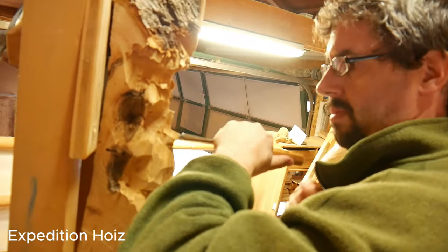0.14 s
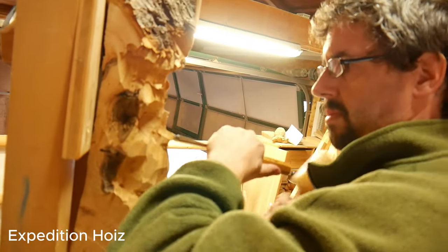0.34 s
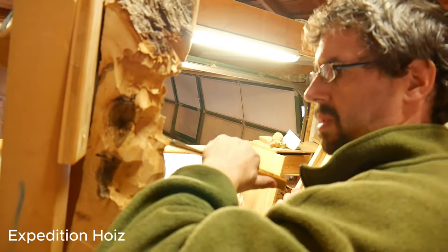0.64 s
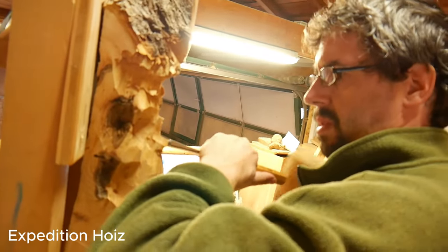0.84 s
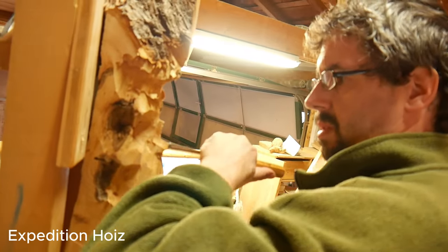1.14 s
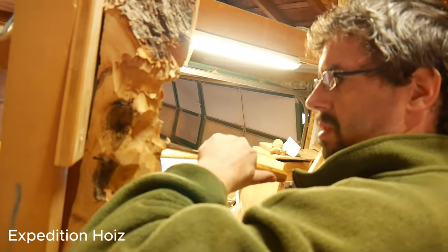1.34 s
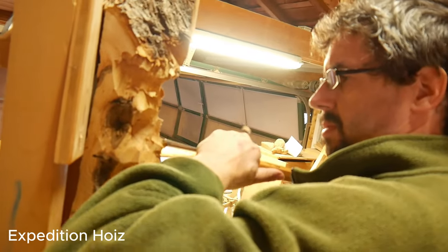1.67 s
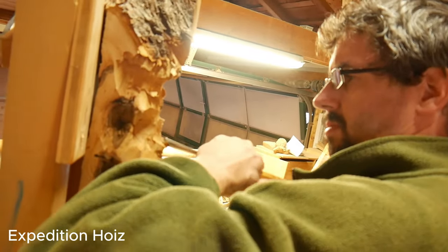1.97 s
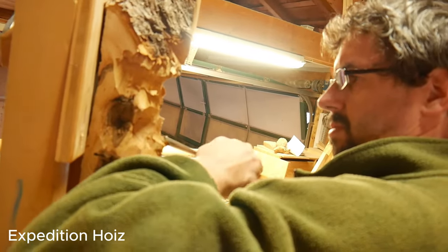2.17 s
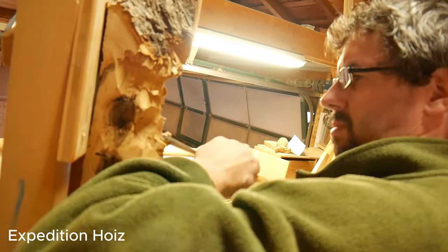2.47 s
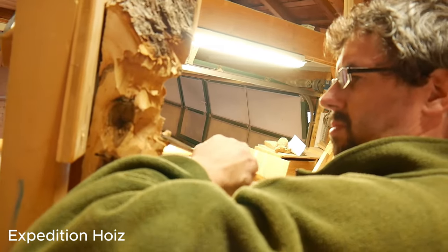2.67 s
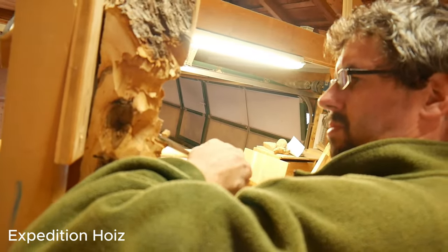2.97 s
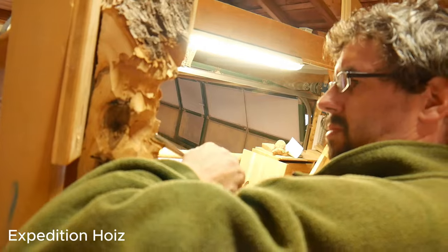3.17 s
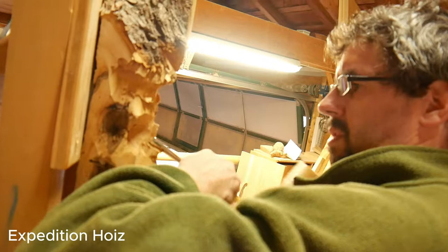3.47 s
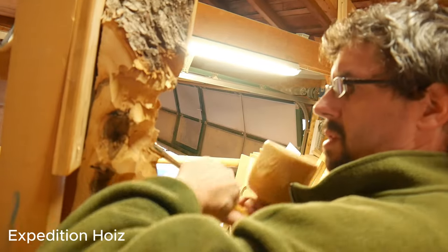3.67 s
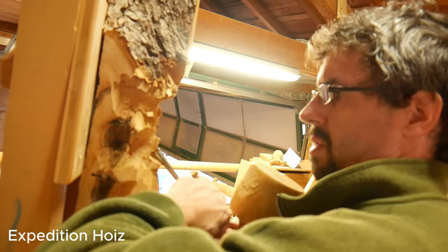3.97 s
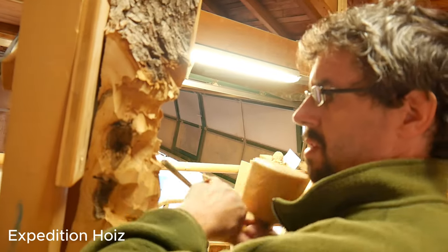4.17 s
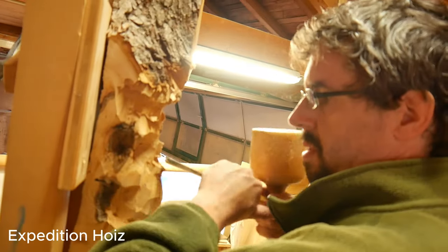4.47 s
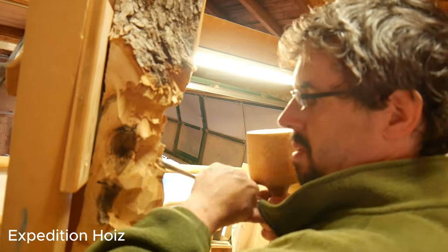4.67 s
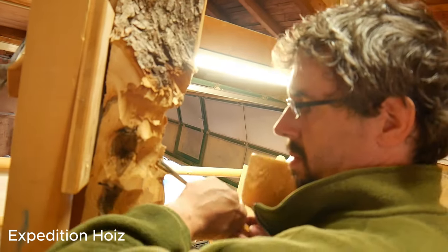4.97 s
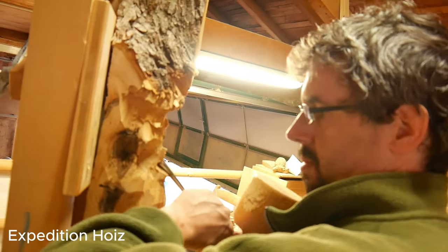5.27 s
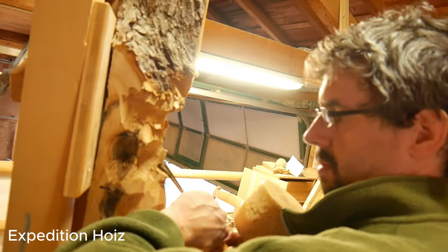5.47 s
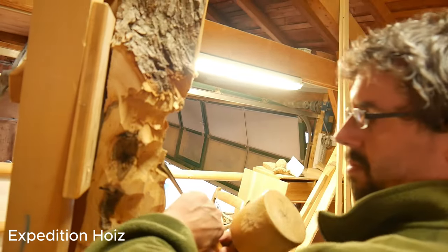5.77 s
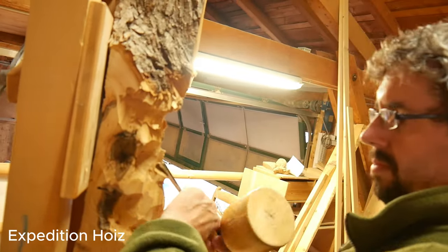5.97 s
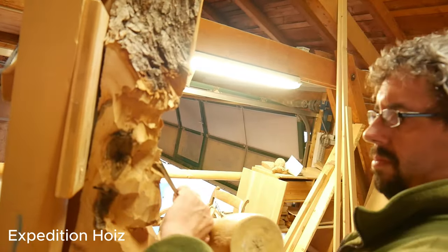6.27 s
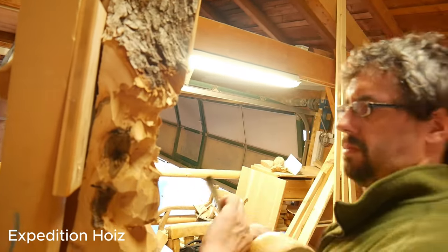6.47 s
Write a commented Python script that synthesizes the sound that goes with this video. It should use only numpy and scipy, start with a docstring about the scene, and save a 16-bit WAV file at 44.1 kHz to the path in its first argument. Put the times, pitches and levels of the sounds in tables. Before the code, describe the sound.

Close, nearly mono sound of carving: a tiny creak, then nine forceful mallet knocks on a gouge set in a log, sharp and woody, slightly distorted at the peaks, with reverberation for around a second. The soft room hum dips under them and returns. Afterwards come light taps, snapping fibres, dull handling bumps and a fleece sleeve rustling, growing clearer toward the end.

```python
"""Carving in a workshop: air, a low wavering hum and faint sleeve fizz; a gouge scuffs and creaks into its cut.
A wooden mallet then drives it into an upright log, nine hard blows and three soft taps: damped and long modes
ring, cracks are noise bursts, the stand rumbles and the room answers with decaying noise.
Filtered grainy noise makes the blade and sleeve rubs, fibre snaps and chip ticks; resonant bursts make the
dull bumps. The close microphone overloads on the hard blows and its gain control ducks the hum."""
import sys
import numpy as np
from scipy import signal
from scipy.fft import rfft, irfft
from scipy.io import wavfile
from scipy.ndimage import uniform_filter1d

SR = 44100
rng = np.random.default_rng(int(sys.argv[2]) if len(sys.argv) > 2 else 0)


def digitize_waveform(pressure):
    """Quantize a signal to 16-bit integers and store it at the path in sys.argv[1].

    Rows of a 2-D input are taken as channels; values are limited to [-1, 1].
    """
    field = np.atleast_2d(pressure).T
    bounded = np.clip(field, -1, 1)
    quanta = np.round(bounded * 32767).astype(np.int16)
    wavfile.write(sys.argv[1], SR, quanta)


N = 291942
TIME = np.arange(N) / SR  # s


def amp(db):
    """Amplitude ratio of a level in dB."""
    return 10 ** (np.asarray(db) / 20)


def unit(x):
    """Scale to rms 1."""
    return x / np.sqrt(np.mean(x ** 2) + 1e-20)


def read(points, hz):
    """A spectrum joined by straight lines on a log-frequency axis."""
    f, value = np.transpose(points)
    return np.interp(np.log(hz + 1), np.log(f + 1), value)


def add(mix, start_s, sound):
    """Mix a sound in at its start time, cut at the end of the mix."""
    part = mix[max(round(start_s * SR), 0):][:len(sound)]
    part += sound[:len(part)]


def noise(points, size):
    """Noise of rms 1 shaped by (hz, db) points."""
    gain = amp(read(points, np.fft.rfftfreq(size, 1 / SR)))
    return unit(irfft(rfft(rng.standard_normal(size)) * gain, size))


def colour(x, points, size=2048):
    """Causal minimum-phase filter with the gain of (hz, db) points."""
    log_gain = np.log(amp(read(points, abs(np.fft.fftfreq(size, 1 / SR)))))
    taps = np.fft.ifft(np.exp(np.conj(signal.hilbert(log_gain)))).real
    return signal.fftconvolve(x, taps[:size // 2])[:len(x)]


def bell(hz, centre_hz, octaves):
    """1 at the centre, falling away on both sides."""
    return np.exp(-.5 * (np.log2(hz / centre_hz) / octaves) ** 2)


# Edges of the friction bands: edge [Hz]
BAND_EDGES_HZ = [300, 1000, 3000, 7000, 16000]


def hump(db, centre_hz, octaves, skirt_db=-38):
    """Levels of the friction bands: strongest around the centre."""
    edges = np.array(BAND_EDGES_HZ)
    band_hz = np.sqrt(edges[1:] * edges[:-1])
    return db + 20 * np.log10(bell(band_hz, centre_hz, octaves) + amp(skirt_db))


def friction(levels_db, size, grain_db):
    """Grainy noise of slipping fibres, with the given level in each band."""
    edges = np.array(BAND_EDGES_HZ)
    band_hz = np.sqrt(edges[1:] * edges[:-1])
    density = np.c_[band_hz, levels_db - 10 * np.log10(np.diff(edges))]
    flicker = unit(uniform_filter1d(rng.standard_normal(size), 40))
    grains = rng.standard_normal(size) * amp(grain_db * flicker)
    shaped = colour(grains, [(80, density[0, 1] - 12), (250, density[0, 1]), *density])
    return unit(shaped) * np.linalg.norm(amp(levels_db))


# Steady workshop air, relative spectrum: pitch_hz [Hz], density_db [dB per Hz]
AIR = [(25, -1), (45, -14.5), (80, 1), (130, -5.5), (190, -4.5), (300, -11.5), (500, -14), (800, -18),
       (1200, -21.5), (1600, -17), (3300, -31.5), (4400, -29), (7000, -40.5), (16000, -40.5)]
AIR_DB = -48
# Machine hum partials: pitch_hz [Hz], level_db [dB rms]
HUM = [(51, -47.5), (77, -52), (101, -61.5), (156, -56.5), (183, -54.5), (194, -58), (386, -63),
       (436, -70.5), (484, -63), (1085, -68)]
# Stir of the sleeve: time_s [s], level_db [dB]
SLEEVE = [(0, -79.5), (3.3, -69.5), (3.8, -58), (4.5, -66), (5.1, -54.5), (5.7, -54.5), (6.0, -54.5),
          (6.62, -42.5)]


def background(waver=0.22):
    """Workshop air, a phase-wavering machine hum and the faint fizz of a fleece sleeve."""
    slow = [(1, 0), (4, -3), (12, -30), (40, -100)]
    hum = np.zeros(N)
    for hz, db in HUM:
        phase_rad = 2 * np.pi * hz * TIME + waver * hz / 50 * noise(slow, N)
        hum += amp(db) * unit(np.sin(phase_rad))
    fizz = noise([(100, 7.5), (800, -0.5), (1500, -8), (2500, -11), (4500, -24.0), (7000, -26), (16000, -27.0)], N)
    flutter_db = 2 * noise([(1, 13.5), (30, 2), (200, -30.5), (1000, -100)], N)
    stir_db = np.interp(TIME, *np.transpose(SLEEVE)) + flutter_db
    return amp(AIR_DB) * noise(AIR, N) + hum + amp(stir_db) * fizz


# Gouge seating: time_s [s], pitch_hz [Hz], creak_db [dB], scuff_db [dB]
CREAK = [(0.02, 152, -65, -50), (0.036, 160, -54.5, -33.5), (0.045, 210, -37, -39),
         (0.059, 287, -38.5, -44), (0.073, 452, -44.5, -57), (.13, 486, -90, -63.5)]


def creak():
    """The gouge scuffs into its cut: shaped noise with a brief rising sine."""
    s, *columns = np.transpose(CREAK)
    t = np.arange(s[0], s[-1], 1 / SR)
    pitch_hz, tone_db, scuff_db = (np.interp(t, s, c) for c in columns)
    tone = unit(np.sin(2 * np.pi * np.cumsum(pitch_hz) / SR))
    scuff = noise([(80, 3.5), (200, -3), (700, 6.0), (1200, -9.5), (3000, -26), (10000, -53)], len(t))
    out = np.zeros(N)
    add(out, s[0], amp(tone_db) * tone + amp(scuff_db) * scuff)
    return out


# Colour shared by every blow: pitch_hz [Hz], gain_db [dB]
STRIKE = [(170, -2.5), (300, 3), (480, -0.5), (830, 0.5), (1080, 2.5), (1600, 1.5), (2600, 3.5), (4500, 0),
          (11000, 2.5)]
SEAT_HZ, SEAT_OCTAVES = 614, 0.11  # the log's main knock, stronger when the edge is firmly seated
SEAT_PUSH_HZ, SEAT_PUSH_OCTAVES = 139, 0.6  # a firm seat also pushes the whole log
FAVOUR_OCTAVES = 0.22  # reach of the landing point's favoured pitch


def strike_tint(seat_db, favoured_hz, lift_db, chip_hz, chip_db, chip_octaves=0.12):
    """Gain (hz, db) of one blow: how the edge sits, where the mallet lands, which chip splits."""
    hz = np.geomspace(100, 16000, 160)
    seated = bell(hz, SEAT_HZ, SEAT_OCTAVES) + bell(hz, SEAT_PUSH_HZ, SEAT_PUSH_OCTAVES)
    db = read(STRIKE, hz) + seat_db * seated + lift_db * bell(hz, favoured_hz, FAVOUR_OCTAVES)
    return np.c_[hz, db + chip_db * bell(hz, chip_hz, chip_octaves)]


# Modes of log, mallet and gouge struck together: pitch_hz [Hz], level_db [dB], t60_s [s]
WOOD = [(130, -19.5, 0.02), (193, -13, 0.034), (262, -14, 0.041), (492, -8, 0.018), (664, -4.5, 0.023),
        (721, -15.5, 0.025), (809, 2.5, 0.011), (822, -12, 0.065), (963, -12, 0.048), (1077, -1, 0.023),
        (1297, -12.5, 0.03), (1510, -7.5, 0.023), (1725, -4, 0.011), (2065, -14.5, 0.018),
        (2644, -7, 0.0063), (3126, -20.5, 0.017), (4170, -25, 0.031), (4740, -28, 0.002),
        (253.8, -41.5, 0.86), (336, -43, 0.97), (610, -30, 0.46), (934, -35, 0.75), (1015, -37.5, 0.64),
        (1103, -42, 0.55), (1220, -42.5, 0.73), (4345, -47, 0.24), (4860, -57, .35)]


def knock(force_db, bite_db, crack_db=-14, crack_s=0.0012, scatter=0.033, click_db=-2, contact_s=0.00051):
    """One blow rings the wood's modes while the edge cracks fibres: as heard close by, and by the room."""
    t = np.arange(SR * 3 // 4) / SR
    hz, db, t60_s = np.transpose(WOOD)[:, :, None]
    damped = t60_s[:, 0] < .15
    # damped modes scatter from blow to blow; the log's long ones stay put
    hz = hz * (1 + scatter * rng.standard_normal(hz.shape) * damped[:, None])
    # a light tap barely seats the edge, so it wakes less of the long ring
    db = db + 1.15 * min(force_db, 0) * ~damped[:, None]
    onset = 1 - np.exp(-t / contact_s)
    modes = -amp(db - 60 * t / t60_s) * np.sin(2 * np.pi * hz * t) * onset
    crack = noise([(300, 5.5), (2000, -1.5), (5000, -0.5), (8000, -9), (11000, -14.0), (16000, -22.0)], len(t))
    close = modes.sum(0) + amp(crack_db + bite_db) * crack * np.exp(-t / crack_s)
    # the room gathers all directions: damped modes and click add in power
    f = np.fft.rfftfreq(2048, 1 / SR)
    click = amp(click_db + read([(500, 0), (2000, 24.5), (5000, 15), (7000, 4.0), (16000, -5.0)], f))
    power = (abs(rfft(modes[damped], 2048)) ** 2).sum(0) + click ** 2
    spread = colour(signal.unit_impulse(len(t)), np.c_[f, 10 * np.log10(power)])
    return close, spread


# Mallet blows, levels relative: start_s [s], force_db [dB], room_send_db [dB], rumble_db [dB],
# seat_db [dB], favoured_hz [Hz], lift_db [dB], crack_db [dB], chip_hz [Hz]
BLOWS = [(0.4145, -2, 0, 6.5, -0.5, 521, 10, -9.5, 3170), (0.8022, 3.5, 2.5, 4, -1.5, 820, 3, 4.5, 3360),
         (1.201, 3.5, 3, 2.5, -2.5, 306, 3.5, 9.5, 3890), (1.5431, 4.5, 3, 2, 1.5, 1550, -0.5, 7, 4400),
         (1.89, 3.5, 2, 1, 3, 300, 0.5, 9, 10100), (2.23, 2, 1.5, -1, -2.5, 1080, 2, 9, 12900),
         (2.5423, 5, 1.5, 0, 3.5, 994, -4, -4.5, 2570), (2.8357, 2, 5, 5, 6.5, 1140, 3, 11, 2370),
         (3.131, 2.5, 2.5, -0.5, 5.5, 970, 2.5, 8, 4670), (3.6512, -12, -2, -7, -9.5, 1056, 9, -3, 2560),
         (4.222, -32, 8, 0, 3.5, 790, 5, -7, 1630), (4.6026, -16.5, 3, -7, -6.5, 850, 4.5, 0.5, 1570)]
CHIP_CLOSE_DB, CHIP_ROOM_DB = 9, 1.5  # the splitting chip's pitch: clear close by, faint in the room


def mallet(level_db=5):
    """All blows: what goes straight to the microphone and what goes into the room."""
    direct, sent = np.zeros(N), np.zeros(N)
    for start_s, force_db, send_db, _, seat_db, favoured_hz, lift_db, bite_db, chip_hz in BLOWS:
        close, spread = knock(force_db, bite_db)
        close = colour(close, strike_tint(seat_db, favoured_hz, lift_db, chip_hz, CHIP_CLOSE_DB))
        spread = colour(spread, strike_tint(seat_db, favoured_hz, lift_db, chip_hz, CHIP_ROOM_DB))
        add(direct, start_s, amp(level_db + force_db) * close)
        add(sent, start_s, amp(level_db + force_db + send_db) * spread)
    return direct, sent


def stand(level_db=-18, swell_s=0.19, t60_s=1.0):
    """Each blow sets the log's stand and the floor rumbling: swelling, decaying low noise."""
    out, t = np.zeros(N), np.arange(SR) / SR
    spectrum = [(25, -19.5), (48, -11.5), (66, -6.5), (87, -4), (110, -15.5), (200, -18), (500, -69.0)]
    for start_s, force_db, _, rumble_db, *_ in BLOWS:
        decay = amp(level_db + force_db + rumble_db - 60 * t / t60_s)
        add(out, start_s, noise(spectrum, len(t)) * (1 - np.exp(-t / swell_s)) * decay)
    return out


def near_echoes(x):
    """Bench, log and carver throw back the first reflections."""
    out = np.zeros(N)
    for delay_s, db in [(.0029, -11.5), (.0068, -32), (.0092, -40.5), (.0165, -19.5)]:
        add(out, delay_s, amp(db) * x)
    return colour(out, [(200, -9), (1100, 1), (2500, -6.5), (7000, -48.5)])


# Workshop's answer: pitch_hz [Hz], level_db [dB], t60_s [s]
ROOM = [(60, 7.5, 1.2), (157, -8.5, 1.6), (324, 5.5, 0.94), (620, 2, 0.9), (800, -6, 0.71),
        (1100, -4.5, 0.86), (1780, -7, 0.96), (2800, -11, 0.96), (5000, -8.5, 0.8), (7240, -14.5, 0.63),
        (11000, -10.5, 0.12), (16000, -4, 0.22)]


def room(x, early_db=5, early_s=0.027):
    """Dense reflections, each band dying at its own speed; three tails trade as the carver moves."""
    f, db, t60_s = np.transpose(ROOM)
    out = np.zeros(N)
    for k in range(3):
        grain = rng.standard_normal(SR * 3 // 2) / np.sqrt(SR / 10)
        hz, t, z = signal.stft(grain, SR, nperseg=512)
        fade_db = read(np.c_[f, db], hz)[:, None] - 60 * t / read(np.c_[f, t60_s], hz)[:, None]
        tail = signal.istft(z * amp(fade_db), SR, nperseg=512)[1]
        t = np.arange(len(tail)) / SR
        tail *= np.clip((t - .004) / 0.0029, 0, 1) * (1 + amp(early_db) * np.exp(-t / early_s))
        share = np.sqrt(2 / 3) * np.cos(np.pi * (TIME + k / 3))
        out += signal.fftconvolve(x * share, tail)[:N]
    return out


# Blade and sleeve rubs: start_s [s], length_s [s], level_db [dB, relative], centre_hz [Hz], width_oct [octaves]
RUBS = [(2.38, 0.03, -42, 2500, 1.07), (3.735, 0.032, -44, 4000, 4), (3.798, 0.016, -46, 1270, 1.4),
        (3.917, 0.007, -45, 1500, 1.45), (4.014, 0.032, -44, 1750, 0.75), (4.373, 0.031, -47, 5500, 0.49),
        (4.72, 0.027, -54, 1200, 2.3), (4.793, 0.035, -44.5, 1130, 1.72), (4.997, 0.056, -36, 1570, 1.13),
        (5.21, 0.032, -58, 5900, 1.8), (5.646, 0.024, -57, 2000, 2.5), (5.918, 0.084, -50.5, 900, 1.8),
        (6.144, 0.036, -54, 3000, 1.7), (6.36, 0.018, -36.5, 7000, 4.5), (6.52, 0.059, -37.5, 1110, 1.47)]


def rubs(level_db=-1):
    """Short strokes of blade or cloth: friction noise that starts quickly and trails off."""
    out, t = np.zeros(N), np.arange(8192) / SR
    for start_s, length_s, db, centre_hz, octaves in RUBS:
        stroke = (1 - np.exp(-t / (0.089 * length_s))) / (1 + (t / length_s) ** 4)
        rub = friction(hump(db, centre_hz, octaves), len(t), grain_db=3.0)
        add(out, start_s, amp(level_db) * rub * stroke)
    return out


# Wood fibres snapping and the sharp clicks of light wooden taps: start_s [s], level_db [dB, relative],
# centre_hz [Hz], width_oct [octaves]
SNAPS = [(3.262, -19.5, 3500, 0.8), (3.365, -44, 4400, 1.2), (3.5724, -39, 2800, 0.9),
         (3.796, -36, 6050, 2.6), (3.8485, -46.5, 6500, 1.3), (4.0117, -35, 1960, 1.2),
         (4.096, -52, 4540, 1.8), (4.375, -37, 5500, 0.63), (4.535, -39, 990, 1.7),
         (4.999, -22, 2920, 0.62), (5.375, -50, 3900, 3.6), (5.428, -49, 2200, 2.2),
         (5.664, -55, 6000, 1.4), (5.882, -43, 1590, 0.48), (5.923, -46.5, 7040, 1.5),
         (6.372, -21.5, 11100, 0.77)]


def snaps(level_db=3, grain_db=3, decay_s=0.0016):
    """A fibre gives way or wood taps lightly: a sharp click that dies in milliseconds."""
    out, t = np.zeros(N), np.arange(4096) / SR
    for start_s, db, centre_hz, octaves in SNAPS:
        snap = friction(hump(db, centre_hz, octaves), len(t), grain_db)
        add(out, start_s, amp(level_db) * snap * np.exp(-t / decay_s))
    return out


# Dull bumps of hand, mallet and loose chips: start_s [s], pitch_hz [Hz], level_db [dB, relative]
BUMPS = [(3.795, 604, -27.5), (3.914, 1010, -33), (4.311, 630, -35.5), (4.545, 230, -34.5),
         (4.603, 298, -26.5), (4.747, 447, -34), (5.206, 1660, -31.5), (5.373, 1410, -32),
         (5.431, 1220, -30.5), (5.513, 1500, -36.5), (5.878, 1400, -35), (6.363, 277, -32)]
BUMP_CYCLES = 37.3  # cycles to fall 60 dB, so low bumps last longer


def bumps(level_db=-4, attack_s=0.00048, skirt_db=-10, octaves=0.18):
    """Light wooden contacts: a short noise burst in one resonance, over a broader skirt."""
    out, t = np.zeros(N), np.arange(8192) / SR
    f = np.geomspace(40, 16000, 80)
    for start_s, pitch_hz, db in BUMPS:
        gain = bell(f, pitch_hz, octaves) + amp(skirt_db) * bell(f, pitch_hz, 0.83) + amp(-62)
        body = noise(np.c_[f, 20 * np.log10(gain)], len(t))
        decay = amp(level_db + db - 60 * t * pitch_hz / BUMP_CYCLES)
        add(out, start_s, body * (1 - np.exp(-t / attack_s)) * decay)
    return out


def crumbs(above_db=0, spread_db=3, centre_hz=3500, octaves=2, decay_s=0.001, count=24):
    """Faint ticks of loose chips at random moments, their level following the sleeve's stir."""
    out, t = np.zeros(N), np.arange(2048) / SR
    for when, size in rng.random((count, 2)):
        start_s = when * N / SR
        db = np.interp(start_s, *np.transpose(SLEEVE)) + above_db + spread_db * (2 * size - 1)
        tick = friction(hump(db, centre_hz, octaves), len(t), grain_db=2)
        add(out, start_s, tick * np.exp(-t / decay_s))
    return out


def ports(mono):
    """Two microphone ports almost in one place: the channels differ only a little, in the treble."""
    side = colour(np.gradient(mono), [(500, -61), (2000, -48.0), (5000, -25), (12000, -18.5)])
    side += colour(mono, [(500, -59), (2000, -55), (5000, -36.0), (12000, -32)])
    return np.array([mono + side, mono - side])


def scene():
    """Blows and handling in the workshop, over its steady background."""
    steady = background()
    small = creak() + rubs() + snaps() + bumps() + crumbs()
    direct, sent = mallet()
    wet = room(amp(-8.5) * sent + amp(-2) * small)
    return ports(direct + near_echoes(direct) + wet + small + stand() + steady)


CEILING, EDGE_HZ = 0.93, 16100  # overload amplitude; band limit


def record(dry, lag_s=0.0012, threshold_db=-8, slope=0.49, recover_db_per_s=28, attack_s=0.0013):
    """Gain control ducks after loud peaks, too late for the first swings, which clip; then the band limit."""
    peak_db = 20 * np.log10(abs(dry).max(0) + 1e-9)
    fall_db = TIME * recover_db_per_s
    held_db = np.maximum.accumulate(peak_db + fall_db) - fall_db
    over_db = np.maximum(held_db - threshold_db, 0)
    over_db = np.interp(TIME - lag_s, TIME, over_db)
    r = np.exp(-1 / (attack_s * SR))
    ducked = dry / amp(slope * signal.lfilter([1 - r], [1, -r], over_db))
    clipped = ducked / (1 + (ducked / CEILING) ** 8) ** (1 / 8)
    lowpass = signal.firwin(511, EDGE_HZ, window=("kaiser", 9), fs=SR)
    return signal.oaconvolve(clipped, lowpass[None], "same")


dry = scene()
out = record(dry)
digitize_waveform(out)
```